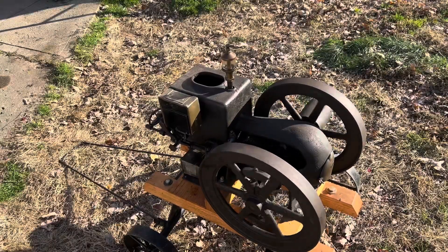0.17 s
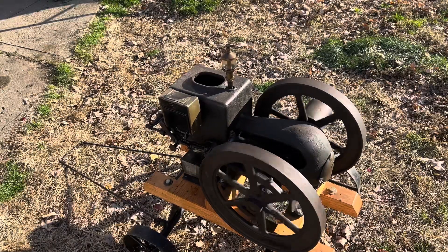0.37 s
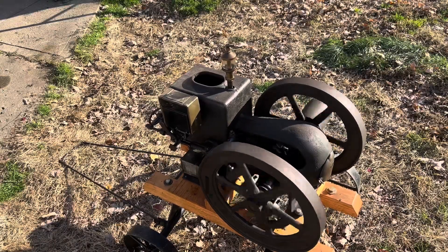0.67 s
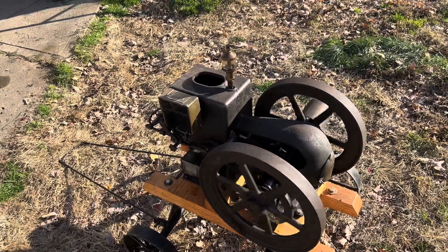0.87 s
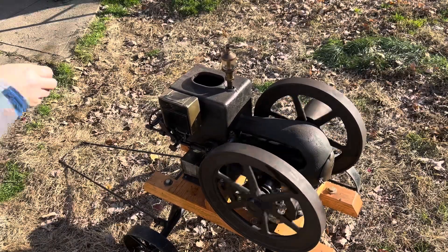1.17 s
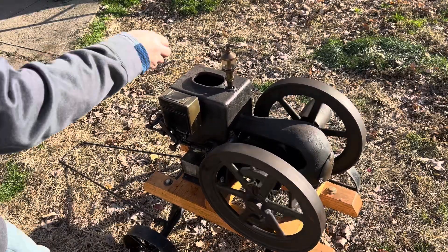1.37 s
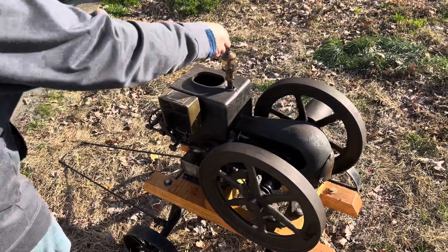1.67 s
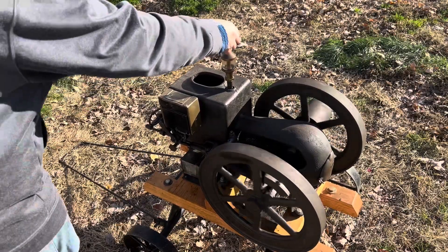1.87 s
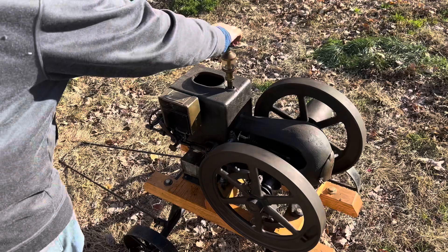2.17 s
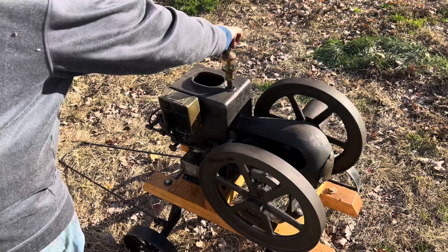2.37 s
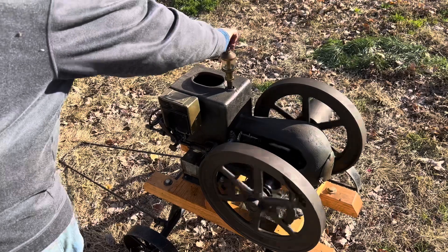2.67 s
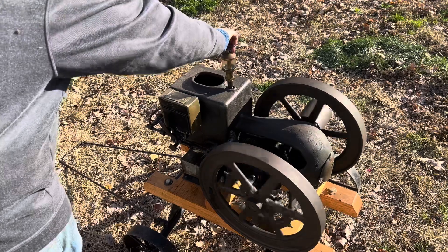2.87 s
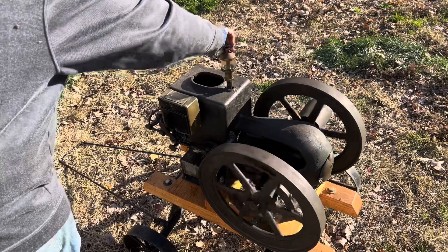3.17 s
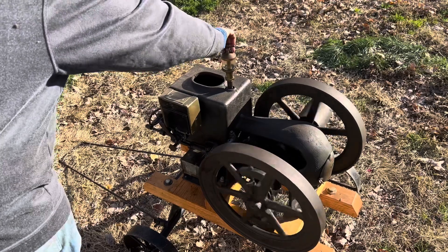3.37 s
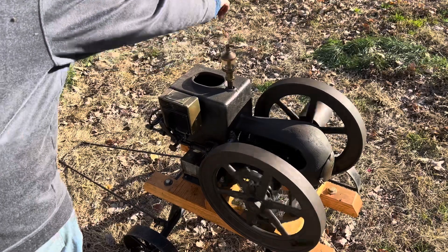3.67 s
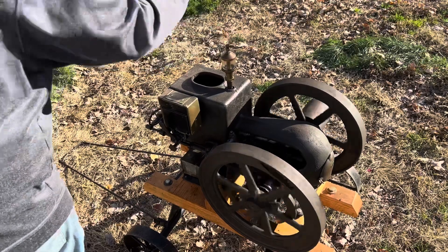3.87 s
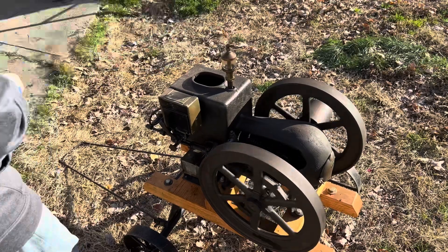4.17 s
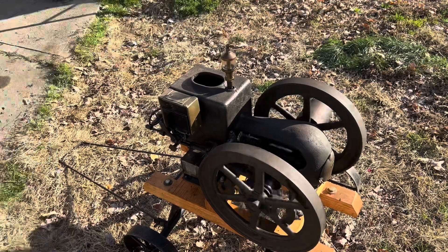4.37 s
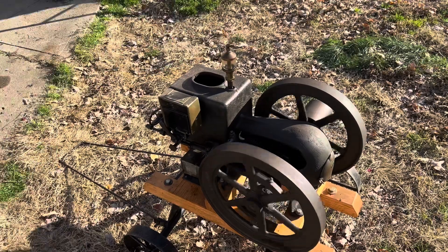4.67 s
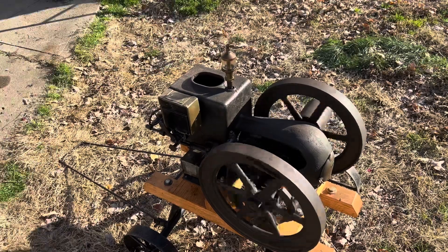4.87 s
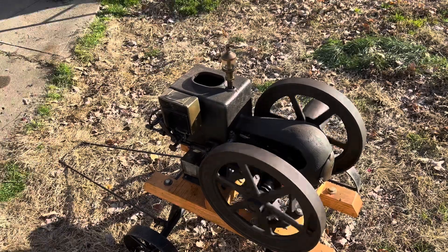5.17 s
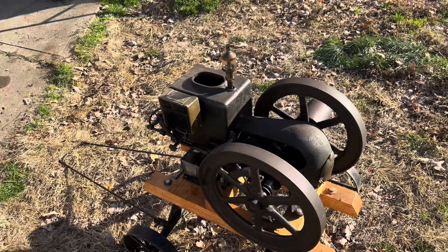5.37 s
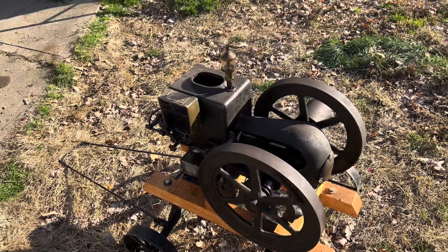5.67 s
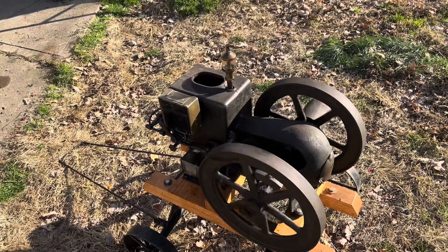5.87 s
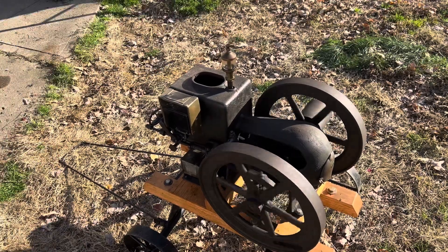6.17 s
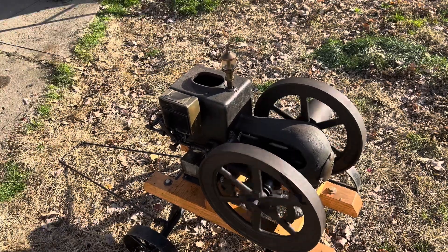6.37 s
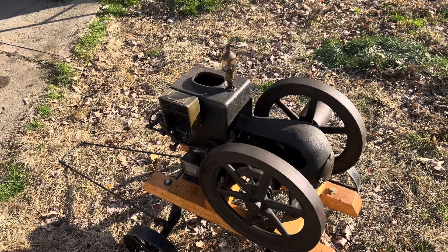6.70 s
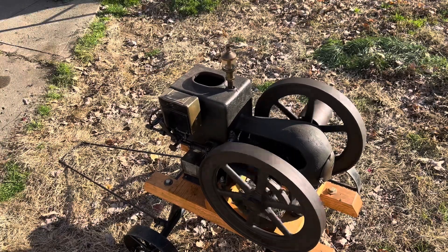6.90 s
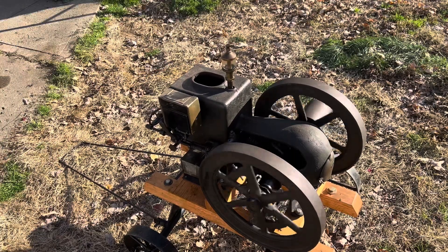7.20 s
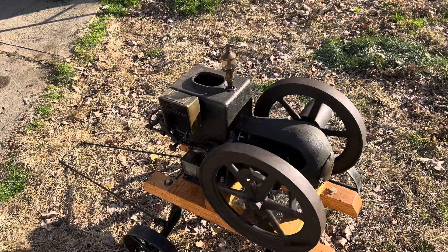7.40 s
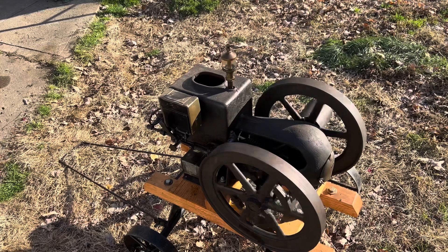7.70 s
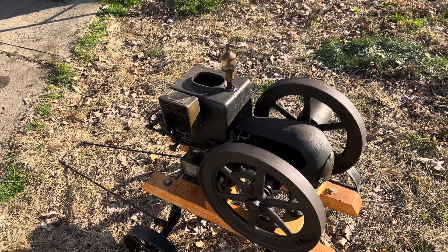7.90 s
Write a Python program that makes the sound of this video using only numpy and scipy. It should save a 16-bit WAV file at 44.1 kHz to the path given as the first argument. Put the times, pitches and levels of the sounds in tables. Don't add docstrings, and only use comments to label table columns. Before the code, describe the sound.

An old one-cylinder engine coasts in an open yard, heard close and dry on a phone microphone. About four times a second its cam clacks sharply against the valve gear, followed by a softer bounce; between come dry latch ticks, a thin jingle of the push rod and alternating airy puffs and draws through the exhaust pipe. Small iron parts ring briefly, with faint squeaks. At about 0.5 seconds a sucking hiss and lever snaps lead to a loud pop and gas blast at 0.65. Clacking resumes at once, brighter from 1 second. A second, strongest firing bursts at 3.1 after its hiss and snaps. From about 4.5 the clatter dulls and fades. A weaker pop comes at 5.6, then softer, muffled clacking, and a faint last pop at 7.85. A low flywheel whir continues underneath, sinking toward the end at 8 seconds.

```python
import sys
import numpy as np
from scipy import signal
from scipy.fft import rfft, irfft, next_fast_len
from scipy.io import wavfile
from scipy.ndimage import uniform_filter1d

SR = 44100
rng = np.random.default_rng(int(sys.argv[2]) if len(sys.argv) > 2 else 0)


def inscribe(sig):
    pcm = np.round(np.clip(np.atleast_2d(sig).T, -1, 1) * 32767)
    wavfile.write(sys.argv[1], SR, pcm.astype(np.int16))


def rack_gain(trim_db):
    fader = np.asarray(trim_db, float)
    return 10 ** (fader / 20)


N = 354563

# [t/s, level/dB, brightness/dB, 60 dB fall/s]
GAS_JETS = [(0.472, -37, -3.5, 0.9), (0.504, -21, -2, 0.56), (0.567, -28.5, -9.5, 0.29),
            (0.599, -10, -2, 0.078), (0.613, -4, -4.5, 0.094), (0.6582, 3.5, -0.6, 0.067),
            (.666, -9, -8, 0.059), (0.682, -20, -4, 0.3), (2.95, -26.5, -9.5, 0.14),
            (2.968, -17, -2.5, 0.3), (3.03, -24, -3.5, 0.29), (3.0624, -6.5, -2, 0.063),
            (3.078, 1.5, -2, 0.068), (3.1212, 5, 0, 0.079), (3.1307, -1.5, -7.5, 0.049),
            (3.146, -17.5, -2.5, 0.23), (5.458, -48, -14, 0.42), (5.471, -39, -2.5, 1),
            (5.533, -45, -11, .37), (5.565, -29.5, -11, 0.13), (5.578, -17.5, -10, 0.14),
            (5.6236, -15.5, -1.5, 0.18), (5.632, -25, -11, 0.081), (5.649, -38, -7, 0.53),
            (7.706, -46.5, -6, 0.96), (7.769, -54, -14, .5), (7.796, -38.5, -14, .08),
            (7.812, -31, -19, 0.37), (7.857, -22, -1.5, 0.26), (7.8685, -34, -12, 0.11),
            (7.885, -40.5, -11.5, 0.64)]
# [f/Hz, density/dB]
JET_COLOUR = [(900, -9), (1500, -9.5), (1840, -5.5), (3020, -14), (4560, -7), (6500, -9), (14900, -5),
              (16200, -9.5)]
# [t/s, peak level/dB, f/Hz, 60 dB fall/s]
PIPE_POPS = [(0.473, -30.5, 436, 0.084), (0.487, -30, 483, 0.079), (0.651, -10, 480, 0.027),
             (0.669, -19.5, 819, 0.11), (2.939, -25.5, 407, 0.032), (3.117, -9, 504, 0.014),
             (3.132, -12, 630, 0.05), (5.611, -21, 492, 0.055), (5.625, -20.5, 504, 0.063),
             (7.852, -28, 420, 0.04), (7.868, -27, 840, 0.042), (7.874, -29.5, 536, 0.11),
             (3.165, -27, 409, 0.092), (3.14, -24, 400, .06), (.668, -20.5, 1257, 0.053),
             (0.663, -24.5, 1850, 0.032), (.697, -29.5, 350, 0.17), (5.575, -43.5, 783, 0.17),
             (5.6275, -12.5, 535, .02), (5.648, -30, 842, 0.15), (5.655, -27.5, 440, .1),
             (7.734, -41.5, 286, 0.21), (7.869, -29, 598, 0.014)]
# [peak t/s, level/dB, f/Hz, length/s]
GUSTS = [
    (0.488, -46, 408, 0.059),
    (0.673, -21, 750, 0.047),
    (2.956, -43, 448, .12),
    (3.133, -20, 554, 0.043),
    (5.445, -55.5, 447, 0.074),
    (5.625, -23, 545, .047),
    (7.75, -64, 283, 0.03),
    (7.867, -29, 823, 0.062),
]
VALVE_OPENINGS = [
    0.651,
    3.117,
    5.606,
    7.85,
]
# [peak t/s, level/dB, length/s]
AIR_PUSHES = [(0.528, -50.5, 0.019), (0.672, -34, 0.0075), (0.711, -44, 0.019), (2.988, -45.5, 0.019),
              (3.118, -32, 0.024), (3.196, -63, 0.036), (.13, -68, 0.041), (3.52, -63, 0.038),
              (5.07, -67.5, 0.042), (5.252, -68.5, 0.038), (5.481, -54.5, 0.023), (5.624, -38.5, 0.027),
              (7.725, -56.5, 0.023), (7.855, -40, 0.028)]
# [t/s, cam level/dB, breath level/dB, pipe f/Hz]
OUT_STROKES = [(0.136, -30.5, -46.5, 524), (0.397, -29, -50, 624), (.887, -27.5, -49, 336),
               (1.1158, -28, -45, 680), (1.352, -27.5, -41, 790), (1.5954, -35.5, -43.5, 730),
               (1.831, -33, -42.5, 780), (2.0804, -32.5, -39.5, 630), (2.3414, -30, -38, 835),
               (2.5933, -35, -42, 840), (2.866, -26.5, -41.5, 750), (3.3534, -33, -41.5, 720),
               (3.591, -26, -41, 730), (3.821, -33, -42.5, 810), (4.0665, -29.5, -39, 720),
               (4.3136, -23, -43.5, 480), (4.564, -32, -51, 451), (4.817, -35, -49.5, 515),
               (5.084, -36, -54.5, 433), (5.3502, -45.5, -58.5, 460), (5.846, -38, -50.5, 456),
               (6.095, -34.5, -45, 812), (6.3304, -33.5, -48.5, 780), (6.575, -38, -51, 690),
               (6.828, -34.5, -53.5, 658), (7.088, -49.5, -57.5, 540), (7.339, -42, -51.5, 724),
               (7.6062, -41.5, -49, 786)]
# [t/s, jingle level/dB, breath level/dB, pipe f/Hz]
IN_STROKES = [(.0473, -44, -43, 407), (.311, -45.5, -47.5, 448), (.826, -34, -45, 346),
              (1.0465, -33.5, -39.5, 330), (1.269, -37, -49.5, 330), (1.506, -34.5, -45.5, 580),
              (1.752, -35.5, -48, 296), (2.002, -36.5, -41, 433), (2.254, -36, -45.5, 355),
              (2.511, -37.5, -41.5, 637), (2.7733, -36.5, -58, 285), (3.2751, -34, -46, 302),
              (3.512, -34.5, -41.5, 348), (3.744, -36.5, -37.5, 590), (3.983, -38, -43.5, 322),
              (4.231, -38.5, -46, 336), (4.482, -40.5, -48, 361), (4.736, -42, -50.5, 340),
              (4.989, -54, -49.5, 472), (5.254, -65, -56.5, 470), (5.79, -57, -48, 460),
              (6.0194, -46.5, -52, 377), (6.248, -52.5, -54.5, 572), (6.489, -54, -53, 510),
              (6.739, -55.5, -52, 676), (6.9794, -55.5, -65.5, 525), (7.24, -60, -70.5, 445),
              (7.5003, -62, -54, 760)]
# [f/Hz, width/Hz, level/dB]
PIPE_MODES = [(294, 127, 4), (515, 9.9, -0.5), (662, 50, -2.5)]
# [peak t/s, level/dB, f/Hz, length/s]
FRAME_JOLTS = [(0.642, -41, 1250, 0.025), (2.989, -38, 2050, 0.045), (3.084, -19.5, 1870, 0.027),
               (3.17, -32.5, 1800, 0.025), (5.474, -55.5, 1620, 0.051), (5.638, -34.5, 1980, 0.048),
               (7.724, -56, 1666, 0.086), (7.862, -33, 1590, 0.022)]
# [f/Hz, width/Hz, level/dB]
FRAME_MODES = [(1033, 74, -7), (1210, 17, 5.5), (1592, 21, 3.5)]
# [t/s, peak level/dB]
REBOUNDS = [(0.1775, -44.5), (0.4444, -39), (0.9263, -34), (1.1568, -34), (1.3922, -33), (1.6327, -34),
            (1.8785, -34), (2.1281, -36), (2.382, -32.5), (2.6434, -34), (2.9094, -33.5), (3.3957, -39),
            (3.6287, -32), (3.8661, -43), (4.1081, -42), (4.359, -32.5), (4.6084, -42), (4.8653, -39),
            (5.1277, -46), (5.3994, -57), (5.889, -46.5), (6.139, -43.5), (6.3694, -42.5), (6.619, -49),
            (6.8698, -42.5), (7.1294, -61), (7.3771, -52.5), (7.6494, -51)]
# [t/s, peak level/dB]
LATCH_TICKS = [(0.121, -34), (0.25, -39.5), (0.385, -38.5), (0.765, -28.5), (0.872, -31.5), (0.9891, -31),
               (1.1067, -28), (1.221, -33.5), (1.3396, -30.5), (1.4566, -31.5), (1.5775, -32.5),
               (1.699, -40.5), (1.82, -38.5), (1.941, -38), (2.0662, -40), (2.19, -39), (2.335, -37),
               (2.452, -42), (2.582, -38), (2.7094, -51), (2.8599, -34), (3.2293, -30.5), (3.344, -32),
               (3.46, -33.5), (3.5744, -31), (3.694, -36), (3.8113, -35.5), (3.9292, -37.5), (4.049, -44),
               (4.1759, -41), (4.297, -35.5), (4.4223, -33), (4.5506, -32), (4.6796, -37), (4.807, -42),
               (4.9245, -42.5), (5.069, -44.5), (5.1992, -58), (5.329, -59.5), (5.7292, -43),
               (5.8294, -49.5), (5.9654, -42), (6.088, -41.5), (6.1992, -47), (6.3187, -48.5),
               (6.4387, -51), (6.5662, -47), (6.689, -50.5), (6.8094, -48), (6.9494, -58.5), (7.0698, -50),
               (7.32, -51), (7.5897, -54.5), (7.969, -52.5)]
# [t/s, brightness/dB]
CAM_SHINE = [(0, -6), (1.2, -1), (3.8, -1), (4.6, -9), (4.8, -28), (5.4, -27), (5.85, -2), (6.15, -26),
             (7, -12), (8.04, -25)]
# [f/Hz, density/dB]
CLACK_COLOUR = [(880, -50.5), (1500, 9), (2730, -6.5), (4450, -6.5), (4860, -3), (7620, -17),
                (15500, -22.5), (16200, -30)]
# [f/Hz, width/Hz, level/dB]
IRON_MODES = [(2782, 117, 6), (3330, 600, 7), (3900, 180, 5), (4903, 100, 2), (5640, 59, -1),
              (8890, 250, -2.5), (9100, 60, -27)]
# [f/Hz, width/Hz, level/dB]
LATCH_MODES = [(8330, 330, -2), (11500, 220, -22.5)]
# [f/Hz, width/Hz, level/dB]
ROD_MODES = [(4586, 50, -8), (6270, 100, 0.5), (7420, 170, -0.5), (7950, 100, -2.5), (9700, 260, -0.5),
             (10600, 310, -9), (12600, 170, 0.5), (15200, 130, -11.5)]
# [t/s, level/dB, f/Hz, length/s]
CLANGS = [(0.595, -26, 6610, .014), (0.612, -23, 6500, 0.019), (.614, -24, 4390, 0.017),
          (0.615, -35, 1820, 0.047), (0.66, -16, 15300, .012), (.71, -53, 4820, .05),
          (2.986, -40, 4600, .03), (3.029, -37, 8720, .016), (3.076, -23, 10570, .016),
          (3.133, -29, 6320, .016), (5.455, -53, 1697, 0.055), (5.627, -42, 3640, 0.04),
          (3.149, -34.5, 2196, .03), (7.81, -47.5, 4100, 0.014), (7.812, -42.5, 1210, 0.039),
          (7.857, -46, 6820, .04)]
# [t/s, level/dB, f/Hz, length/s]
IRON_RINGS = [(0.672, -46.5, 2080, 0.093), (0.9, -45, 1222, 0.081), (1.032, -47.5, 1580, 0.054),
              (1.264, -53.5, 6140, 0.073), (2.492, -58, 7330, 0.11), (1.83, -57, 5050, 0.074),
              (2.085, -56, 9700, 0.06), (4.22, -57, 4500, 0.065), (4.545, -50, 8200, 0.039),
              (1.339, -54, 9530, 0.04), (1.4, -52.5, 1610, 0.1), (1.89, -50.5, 1598, 0.14),
              (2.346, -53, 9600, 0.07), (2.354, -50, 4820, 0.065), (2.767, -49.5, 6150, 0.042),
              (3.497, -50, 9850, 0.039), (3.395, -55, 2800, 0.034), (.897, -57, 4930, 0.098),
              (1.14, -55, 4860, 0.065), (1.035, -56, 12700, 0.063), (1.255, -55, 12600, 0.13),
              (1.36, -57, 9530, .05), (4.815, -53, 5400, .025), (4.825, -60, 1330, 0.083),
              (4.965, -65.5, 6300, 0.068), (5.082, -51, 3990, 0.038), (5.124, -47.5, 1447, 0.021),
              (3.605, -52, 4840, 0.067), (3.74, -50, 9800, 0.023), (3.737, -48.5, 6180, 0.04),
              (4.086, -46, 4850, 0.048), (4.305, -54, 2770, 0.1), (4.335, -46.5, 1210.0, 0.087),
              (4.32, -46, 4850, 0.064), (4.426, -49, 2022, 0.04), (4.575, -49, 4914, 0.044),
              (5.398, -53.5, 1458, 0.061), (5.425, -57.5, 1680, 0.16), (6.08, -49.5, 1210.0, 0.15),
              (6.205, -68, 3085, 0.079), (6.433, -65, 2035, 0.074), (6.682, -66, 2010, 0.05),
              (6.82, -53.5, 1678, 0.093), (7.66, -54, 1202, 0.11), (7.7, -49.5, 1760, 0.059),
              (7.792, -46, 1210.0, 0.026),
              (4.1, -60, 3365, 0.063), (4.94, -65.5, 3130, 0.06), (7.189, -73, 3400, 0.076),
                  (4.765, -65, 3200, 0.09), (7.108, -65, 1412, 0.079), (7.186, -74.5, 2400, 0.042),
                  (5.85, -60, 2000, 0.1), (5.855, -55.5, 3900, .035), (5.89, -65, 5500, .05),
                  (6.09, -51, 1650, 0.095), (2.9, -49, 2790, .04), (2, -49.5, 2780, .035),
                  (1.995, -65, 4500, 0.045), (2.1, -59, 7300, .03), (2.245, -57, 6200, .05),
                  (2.868, -45.5, 1600, .07), (1.428, -55, 2500, 0.051), (1.484, -56, 2000, .014),
                  (1.352, -50.5, 3200, .022), (1.39, -50, 3100, .03), (1.588, -55, 2400, .022),
                  (1.638, -57, 3000, 0.048), (2.862, -44, 750, .06), (5.383, -64, 5800, 0.035),
                  (5.445, -64.5, 6600, 0.033), (5.457, -63, 2600, 0.056), (6.33, -60, 2780, .03),
                  (5.9, -71.5, 6200, .06), (5.3, -68, 8000, .03), (6.578, -62.5, 2780, 0.093),
                  (6.728, -71.5, 6200, 0.064), (6.7, -56, 750, 0.06), (7, -54, 800, 0.072),
                  (.4, -43, 4000, 0.022), (7.4, -56, 700, .045), (6.1, -57, 1510, 0.037)]
# [f/Hz, density/dB]
YARD_COLOUR = [(25, -20.5), (108, -16.5), (400, -4.5), (677, -6.5), (1610, -17.5), (2410, -24.5),
               (8360, -30), (16000, -36.5)]
# [t/s, level/dB, treble against it/dB]
WHIR_LEVELS = [(0, -55.5, -5.5), (1, -49.5, -8), (4.4, -51, -6), (5.3, -59.5, -7), (8.04, -61, -11)]


def evened(x):
    return x / np.sqrt(np.mean(x ** 2) + 1e-20)


def add(mix, s, sound):
    at = round(s * SR)
    part = mix[max(at, 0):][:len(sound) + min(at, 0)]
    part += sound[max(-at, 0):][:len(part)]


def coloured(points, lo_hz, hi_hz, ragged_db):
    size = next_fast_len(N)
    hz = np.fft.rfftfreq(size, 1 / SR) + 1
    f, db = np.transpose(points)
    modes = np.interp(hz, np.arange(0, SR / 2, 110), rng.standard_normal(201))
    gain = rack_gain(np.interp(np.log(hz), np.log(f), db) + ragged_db * modes)
    gain /= np.sqrt((1 + (lo_hz / hz) ** 6) * (1 + (hz / hi_hz) ** 6))
    return evened(irfft(rfft(rng.standard_normal(size)) * gain, size)[:N])


def resonate(x, hz, width):
    r = np.exp(-np.pi * max(width, 5) / SR)
    top = [1 - r * r, 0, r * r - 1]
    bottom = [2, -4 * r * np.cos(2 * np.pi * hz / SR), 2 * r * r]
    return signal.lfilter(top, bottom, x)


def rattle(per_s, depth_db):
    count = int(N * per_s / SR) + 2
    steps = rng.standard_normal(count)
    return evened(rack_gain(depth_db * np.interp(np.arange(N) * per_s / SR, np.arange(count), steps)))


def patchy(x, depth_db, frames, bins):
    z = signal.stft(x, nperseg=128, noverlap=64)[2]
    patches = uniform_filter1d(rng.standard_normal(z.shape[::-1]), frames, 0)
    patches = uniform_filter1d(patches, bins, 1)
    gain = evened(rack_gain(depth_db * evened(patches.T)))
    return signal.istft(z * gain, nperseg=128, noverlap=64)[1][:N]


def bursts(rows, dull, bright, lead_db):
    power = np.zeros((2, N))
    t = np.arange(-SR // 20, SR // 4) / SR
    after = np.maximum(t, 0)
    for s, db, bright_db, rise, t60, hold in rows:
        fall = rack_gain(-60 * after / max(t60, .02)) * np.exp(-(after / hold) ** 2)
        attack = np.tanh((after / max(rise, .0005)) ** 1.5)
        attack = attack + rack_gain(lead_db) * np.exp(-abs(t) / 0.0022)
        share = np.clip(rack_gain(2 * bright_db), .003, .9)
        burst = (rack_gain(db) * attack * fall) ** 2
        add(power[0], s - .003 + t[0], (1 - share) * burst)
        add(power[1], s - .003 + t[0], share * burst)
    return np.sqrt(power[0]) * dull + np.sqrt(power[1]) * bright


def humps(rows, narrow, wide, wide_db, skew):
    out, air = np.zeros(N), rng.standard_normal(N + SR)
    u = np.linspace(-2, 2.5, 200)
    shape = np.exp(-np.where(u < 0, skew, 1) * 1.74 * u ** 2)
    for s, db, hz, length in rows:
        count = int(4.5 * length * SR)
        x = air[round(s * SR):][:count]
        note = evened(resonate(resonate(x, hz, narrow * hz), hz, narrow * hz))
        band = evened(resonate(resonate(x[::-1], hz, wide * hz), hz, wide * hz))
        swell = np.interp(np.linspace(-2, 2.5, count), u, shape)
        burst = (note + rack_gain(wide_db) * band) * swell
        add(out, s - 2 * length, rack_gain(db) * burst / np.sqrt(np.mean(burst ** 2) / np.mean(swell ** 2)))
    return out


def struck(rows, modes, rise, hold):
    out, t = np.zeros(N), np.arange(SR // 6) / SR
    force = np.tanh((t / rise) ** 2) * np.exp(-(t / hold) ** 2)
    shake = rng.standard_normal(N + SR) * np.resize(rattle(220, 4.2), N + SR)
    favour = rng.uniform(-1.1, 1, (len(rows), len(modes), 2))
    for (s, db, *_), luck in zip(rows, favour):
        x = shake[round(s * SR):][:len(t)] * force
        ring = np.zeros(len(x))
        for (hz, width, level_db), (a, b) in zip(modes, luck):
            tone = resonate(x, hz * (1 + .012 * b), width)
            ring += rack_gain(level_db + 4.5 * a) * tone / np.sqrt(width)
        add(out, s - rise, rack_gain(db) * ring / abs(ring).max())
    return out


def firing():
    rows = [(s, db, bright_db, .006, t60, .12) for s, db, bright_db, t60 in GAS_JETS]
    dull, bright = coloured(JET_COLOUR, 900, 9000, 1.8), coloured(JET_COLOUR, 9000, 17000, 1.5)
    jets = patchy(bursts(rows, dull, bright, -13), 3.2, 4, 5)
    out, t = rack_gain(-8) * jets * rattle(400, 1.2), np.arange(SR // 4) / SR
    for s, db, hz, t60 in PIPE_POPS:
        fall = rack_gain(db - 60 * t / t60)
        add(out, s - .002, fall * np.tanh(t / 0.0021) * np.sin(2 * np.pi * hz * t))
    return out


def pipe_breath():
    blows = [(s + .04, db, hz, .055) for s, _, db, hz in OUT_STROKES]
    draws = [(s + .022, db, hz, .036) for s, _, db, hz in IN_STROKES]
    breath = humps(blows + draws + GUSTS, 0.3, 1.7, 2.2, 0.45) * rattle(90, 2)
    return 0.35 * breath + sum(rack_gain(db) * resonate(breath, hz, width) for hz, width, db in PIPE_MODES)


def air_pushes():
    out, t = np.zeros(N), np.arange(-SR // 8, SR // 8) / SR
    rumble = coloured([(20, -12.0), (150, -5), (400, -0.5)], 55, 220, 0)
    for s, db, length in AIR_PUSHES:
        swing = np.exp(-(t / length) ** 2) * np.sin(7.7 * t / length + 0.4)
        trail = np.exp(-((t - .008) / (2.3 * length)) ** 2) * np.roll(rumble, -round(s * SR))[:len(t)]
        add(out, s + t[0], rack_gain(db) * (rack_gain(5.0) * swing + trail))
    return out


def exhaust_valve():
    t = np.arange(N) / SR
    return 1 - .9 * sum(np.interp(t - s, [-.09, -.06, .004, .018], [0, 1, 1, 0]) for s in VALVE_OPENINGS)


def cam_clacks():
    rows = [(s, db) for s, db, *_ in OUT_STROKES]
    rows += [(s, db - 2) for s, db in REBOUNDS]
    return [(s, db, np.interp(s, *np.transpose(CAM_SHINE))) for s, db in rows]


def valve_gear():
    dull, bright = coloured(CLACK_COLOUR, 1900, 8000, 4.7), coloured(CLACK_COLOUR, 8000, 16000, 4.5)
    clacks, ticks = cam_clacks(), [(s, db - 0.5) for s, db in LATCH_TICKS]
    soft_from_s, sharp_s, soft_s = 5.7, 0.0038, 0.0062
    # t/s, level/dB, brightness/dB, rise/s, 60 dB fall/s, hold/s
    rows = [(s, db - 11.0, bright_db, soft_s if s > soft_from_s else sharp_s, .3, .013)
            for s, db, bright_db in clacks]
    rows += [(s + .008, db - 16.5, bright_db - 3.5, .006, .5, .045) for s, db, bright_db in clacks]
    rows += [(s, db - 13.5, -6.5, .004, .2, .012) for s, db, *_ in IN_STROKES]
    rows += [(s, db - 8, -3, soft_s / 2 if s > soft_from_s else sharp_s, .12, .009) for s, db in ticks]
    rows += [(s + 0.012, db - 16.5, -3.5, .006, .4, .04) for s, db in ticks]
    rows += [(s, db - 31, -3.5, .015, .6, .04) for s, db, *_ in IN_STROKES]
    contact = bursts(rows, dull, bright, -11.5)
    contact = patchy(contact * rattle(600, 3), 4.5, 4, 4)
    iron = rack_gain(-8.0) * struck(clacks, IRON_MODES, 0.003, 0.039)
    latch = rack_gain(-8) * struck(ticks, LATCH_MODES, .002, .012)
    rod = rack_gain(-4.5) * struck(IN_STROKES, ROD_MODES, 0.022, 0.034)
    return contact + iron + latch + rod


def frame_scrapes():
    luck = rng.uniform(-1.32, 1, len(OUT_STROKES))
    rows = [(s + .036, db - 1, 1160 * (1 + 0.21 * a), .06)
            for (s, _, db, _), a in zip(OUT_STROKES, luck)]
    scrapes, jolts = humps(rows, 0.17, 0.85, 7.2, 0.96), humps(FRAME_JOLTS, .15, .8, 5.0, 3.1)
    return (scrapes + jolts) * rattle(300, 4.2)


def singing_parts():
    rows, rub = IRON_RINGS + CLANGS, rng.standard_normal(N + SR)
    out, chance = np.zeros(N), rng.random((len(rows), 3))
    purity = 0.38
    for (s, db, hz, length), (a, b, c) in zip(rows, chance):
        t = np.arange(int(1.8 * length * SR)) / SR
        swell = np.tanh((t / (0.09 * length)) ** 2) * np.exp(-2.2 * (t / length) ** 1.81)
        waver = 1.1 * np.sin(2 * np.pi * ((15 + 25 * b) * t + c))
        width = .016 * hz + 30
        x = rub[round((s + b / 2) * SR) - 400:][:len(t) + 400]
        fuzz = evened(resonate(resonate(x, hz, width), hz, width)[400:])
        steady = np.sin(2 * np.pi * (hz * t + a) + waver)
        note = purity * steady + 0.93 * (1 - purity) * fuzz
        add(out, s, rack_gain(db + 7.0) * swell * note)
    return out * rattle(140, 3.6)


def dead_centre():
    t = np.arange(N) / SR
    outer = sum(np.interp(t - s, [-.045, -.025, -.006, .005], [0, 1, 1, 0]) for s, *_ in OUT_STROKES)
    inner = sum(np.interp(t - s, [-.06, -.04, -.018, -.002], [0, 1, 1, 0]) for s, *_ in IN_STROKES)
    return 1 - .74 * outer - .7 * inner


def flywheel_whir():
    s, db, treble_db = np.transpose(WHIR_LEVELS)
    t = np.arange(N) / SR
    low, high = coloured(YARD_COLOUR, 20, 1500, 1.2), coloured(YARD_COLOUR, 1500, 17000, 2.2)
    wind = rack_gain(-77) * coloured(YARD_COLOUR, 13, 130, 1.5) * rattle(6.8, 2.5)
    whir = low + rack_gain(np.interp(t, s, treble_db)) * high
    return wind + rack_gain(np.interp(t, s, db)) * whir * rattle(40, 1.5)


def scene():
    fire, scrape, pause = firing(), frame_scrapes(), dead_centre()
    air = (pipe_breath() + air_pushes()) * exhaust_valve()
    moving = (air + 0.63 * scrape) * pause
    gear, singing = valve_gear(), singing_parts()
    floor = flywheel_whir() * pause ** 0.38
    frame = sum(rack_gain(db) * resonate(scrape + 0.29 * floor, hz, width) for hz, width, db in FRAME_MODES)
    return (fire + moving + gear + singing + frame + floor)[None]


def band_limit(x):
    return signal.sosfilt(signal.butter(12, 16400, fs=SR, output="sos"), x)


def record(dry):
    z = signal.stft(dry, nperseg=512, noverlap=384)[2]
    power = uniform_filter1d(abs(z) ** 2, size=7, axis=2) + 1e-16
    band = uniform_filter1d(power, size=15, axis=1)
    usual = np.exp(uniform_filter1d(np.log(band), size=120, axis=2))
    z *= np.clip(power / band, .05, 3) ** .22
    z *= np.clip(band / usual, .01, 1) ** .22
    clean = signal.istft(z, nperseg=512, noverlap=384)[1][:, :N]
    ceiling = 1.5
    limited = ceiling * np.tanh(1.08 * clean / ceiling)
    treble_cut = signal.firwin(511, 15950, window=("kaiser", 9), fs=SR)
    mix = signal.oaconvolve(limited, treble_cut[None], "same")
    return band_limit(mix)


dry = scene()
out = record(dry)
inscribe(out)
```